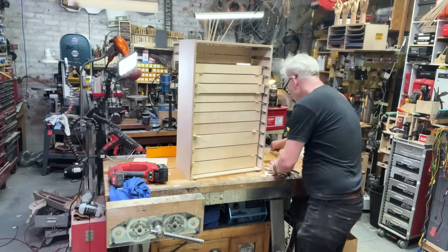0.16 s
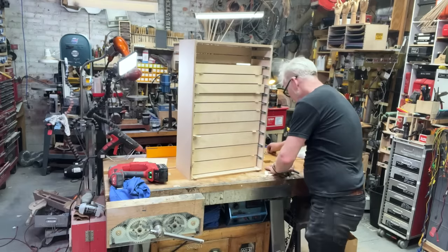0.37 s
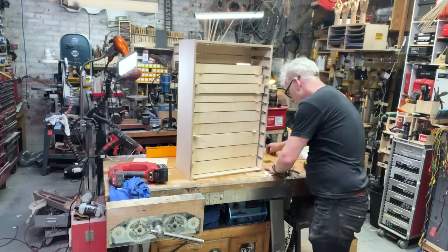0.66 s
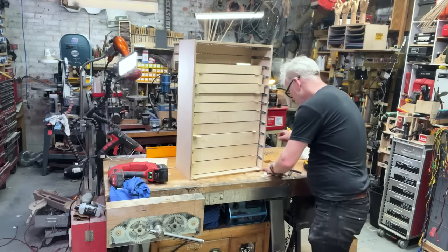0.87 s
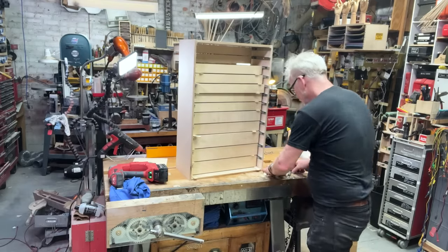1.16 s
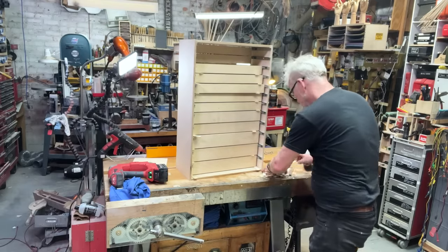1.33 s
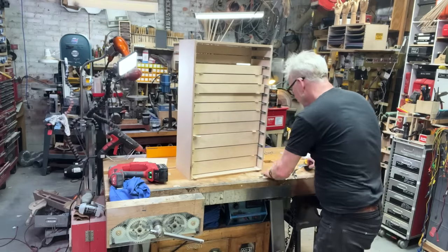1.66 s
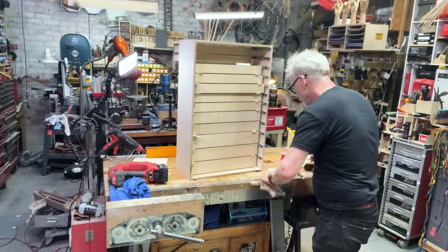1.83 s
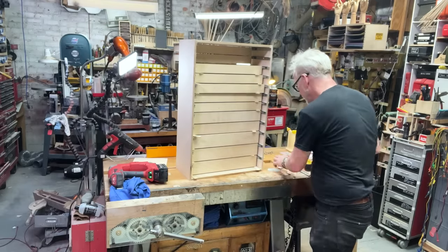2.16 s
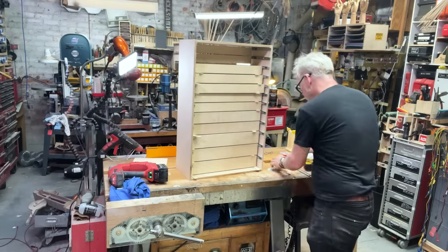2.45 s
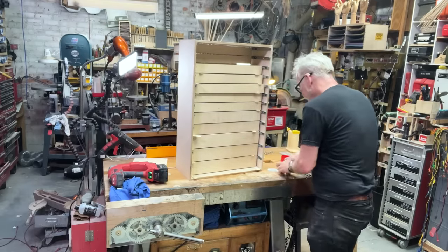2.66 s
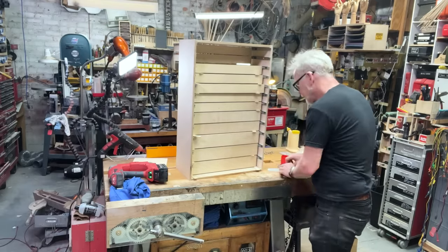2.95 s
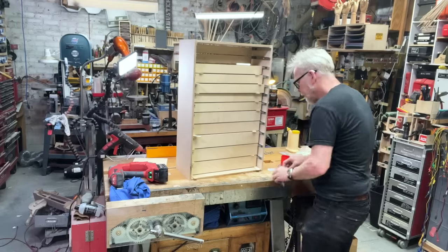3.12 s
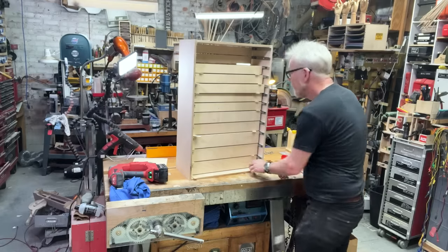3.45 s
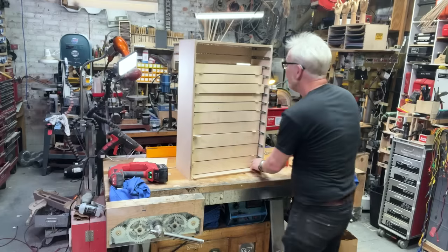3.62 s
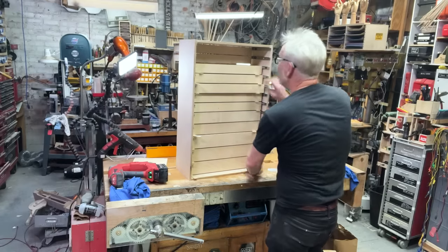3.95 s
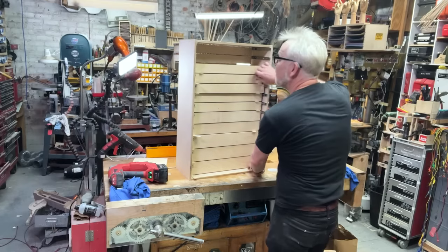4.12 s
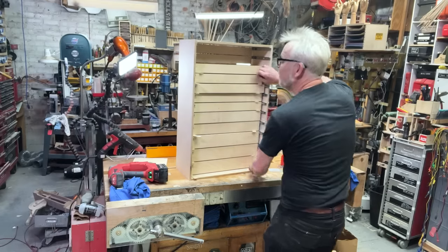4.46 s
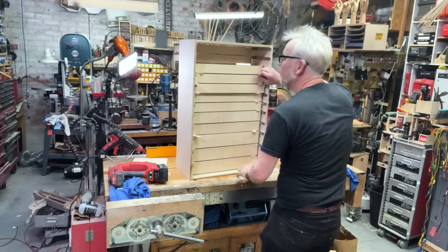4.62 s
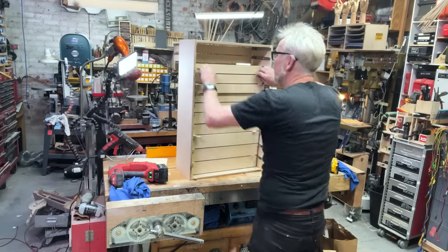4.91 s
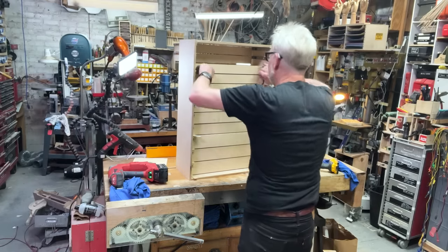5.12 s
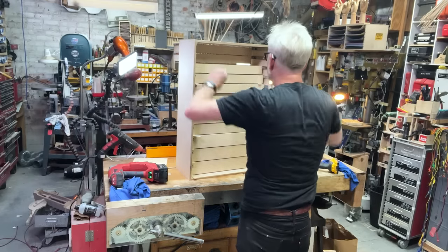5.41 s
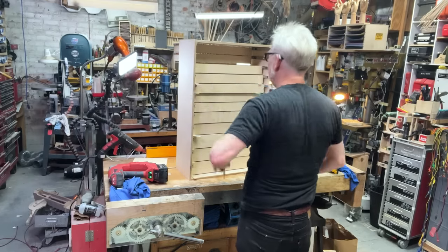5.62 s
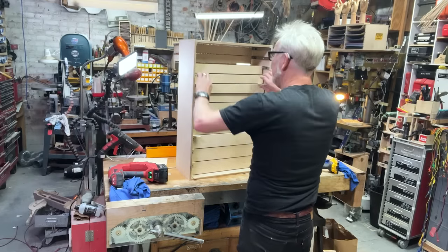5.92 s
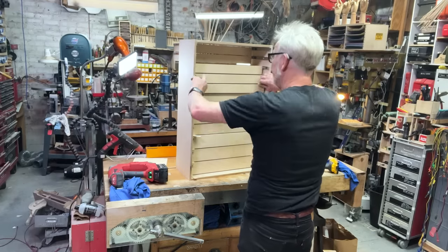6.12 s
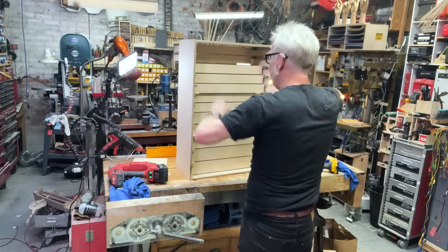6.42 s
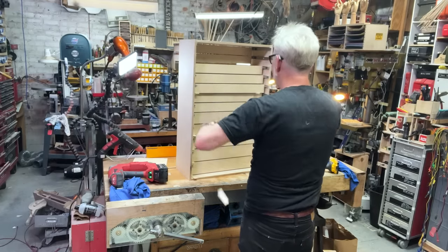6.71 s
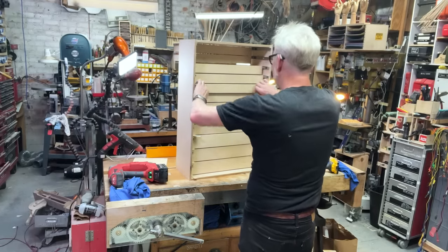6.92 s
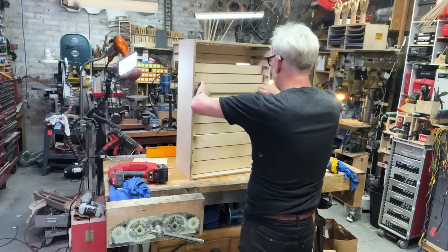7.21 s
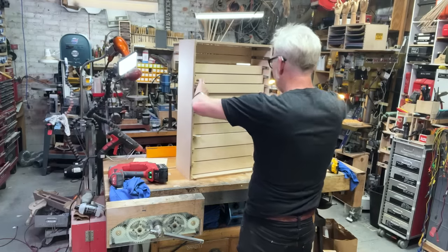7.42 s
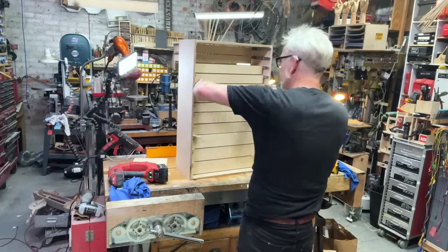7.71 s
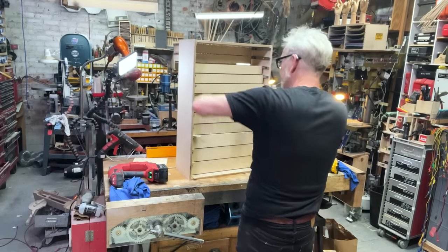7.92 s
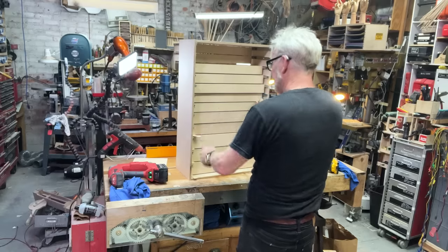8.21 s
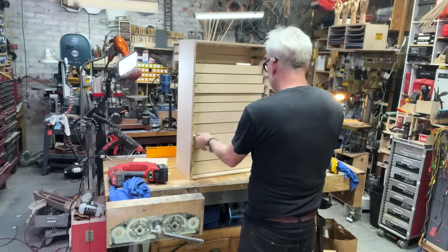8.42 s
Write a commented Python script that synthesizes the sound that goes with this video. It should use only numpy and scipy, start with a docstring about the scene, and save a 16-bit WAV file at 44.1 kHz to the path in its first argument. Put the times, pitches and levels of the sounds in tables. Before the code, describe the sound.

Thin wooden sticks clatter and bounce on a hard floor while wooden drawers knock, scrape and drop in an echoing workshop.

```python
"""Thin wooden sticks clatter onto a hard floor, each one ringing briefly as it bounces.
They are spacers, pulled from between the drawers of a small cabinet on a workbench.
A handful falls first; then each freed drawer knocks down and its stick drops and hops.
Wood rasps as it slides on wood, and the heavy bench thuds when it is bumped.
A cluttered workshop with a low hum echoes every blow."""
import sys
import numpy as np
from scipy import signal
from scipy.fft import rfft, irfft, next_fast_len
from scipy.io import wavfile
from scipy.ndimage import uniform_filter1d, minimum_filter1d

SR = 44100
rng = np.random.default_rng(int(sys.argv[2]) if len(sys.argv) > 2 else 0)


def output_pcm(signal):
    """Save a mono or channel-first signal as 16-bit PCM at the path in sys.argv[1].

    Samples are clipped to [-1, 1] before scaling.
    """
    pcm = np.clip(np.atleast_2d(signal).T, -1, 1) * 32767
    wavfile.write(sys.argv[1], SR, np.round(pcm).astype(np.int16))


N = 377937
NOW = np.arange(N) / SR  # clocks in seconds: the whole scene, one hit, one echo
BRIEF = np.arange(4096) / SR
TAIL = np.arange(24576) / SR

# A stick lands; flatness is how flat it falls: start_s, level_db, pitch_hz, flatness_db, tick_db
STICK_BOUNCES = [ (0.8793, -6.5, 6770, -21.5, -19), (1.568, -10.5, 6930, 8, 10.5), (2.251, 5, 6600, -2, 5),
                 (2.298, 11, 7960, 3.5, -13), (2.325, 13, 7500, 5.5, -7), (2.336, 6, 6880, 13.5, -11),
                 (2.355, 6, 5935, 6, -6.5), (2.375, 4.5, 7010, -7, 10.5), (2.394, 5.5, 6950, 7.5, -2),
                 (2.408, 11, 6070, -15.5, -22), (2.454, 9.5, 7030, 3, -10.5), (2.522, 7.5, 7800, 0, -8),
                 (2.546, 5.5, 7580, 8.5, -6), (2.5978, 16.5, 7160, 5, -8.5), (2.635, 8, 7940, 6.5, -16.5),
                 (2.689, 9.5, 6950, 0, -2.5), (2.695, 8, 7140, -3, -16.5), (2.809, -0.5, 7150, 0, -8),
                 (2.838, -2.5, 7020, 1.5, -8.5), (2.907, -7, 7220, -1, -9.5), (2.9726, 10, 8560, 0, -14),
                 (3.0585, 7.5, 8640, -6.5, -12), (3.066, -1, 8766, -2.5, -10.5),
                 (3.1303, 0, 8360, -7.5, -4.5), (3.695, 9, 7100, -17.5, -1), (3.721, 5, 7540, -1, 3),
                 (3.763, 17.5, 6670, -8, -7.5), (3.7823, 11.5, 6910, -11, -21), (3.82, 13, 6840, 0, -28),
                 (3.867, 8, 6660, 7, -22), (3.981, 0.5, 6730, 2.5, 1), (4.061, -3.5, 6640, 10, 1),
                 (4.184, 12, 6710, -6.5, -6), (4.312, -9, 8060, 0.5, -13), (5.479, 7, 6760, -16.5, -5),
                 (5.572, 1.5, 7020, -3, -5), (6.575, -1.5, 7300, 2, -0.5), (6.587, 5, 7120, -2, -6),
                 (6.8097, 13.5, 7120, -8.5, -15), (7.298, -3, 6650, 21.5, -28),
                 (7.3106, 16.5, 6870, -11, -12.5), (7.3553, 9, 7710, 1, 0), (7.443, 5.5, 7450, 1, -7),
                 (7.449, 5.5, 6000, -6.5, -18), (7.498, 1, 6190, 4.5, -18.5), (7.5319, -4, 6030, 5.5, 3.5),
                 (7.5921, 3, 6757, -1.5, -7.5), (8.400, -6.5, 6750, 16.5, -23), (8.482, 1.5, 6640, 17, -7),
                 (8.519, 8, 6810, 4, -19)]
# A heap of sticks tumbles: start_s, length_s, level_db, first_pitch_hz
HEAP_FALLS = [(2.256, .66, 0, 7335), (3.689, .22, 0, 6910), (7.301, .3, -11, 6810)]
# The tones (modes) of a bending stick; a decay is the time to fade by 60 dB:
# pitch_ratio, level_db, decay_s
STICK_TONES = [(0.873, -8, 0.016), (0.932, -10, 0.0145), (0.973, 3.5, 0.012), (1.016, 1.5, .018),
               (1.28, -31.5, 0.0061)]
# The broad clack of a stick on the floor: frequency_hz, level_db
CLACK_SPECTRUM = [(80, -8.5), (300, -3), (1200, -4), (2400, -2.5), (5000, -0.5), (8000, -4.5),
                  (12000, -24.5)]
# The high tick of the same contact: frequency_hz, level_db
TICK_SPECTRUM = [(3000, -25), (7000, 5), (9000, 2.5), (11000, -5.5), (12500, -13.5), (15000, -22)]
# A freed drawer lands on one edge, then falls flat:
# start_s, level_db, wait_until_flat_s, hollow_db, bass_db, edge_treble_db, flat_treble_db
DRAWER_DROPS = [(5.1489, 13.5, 0.007, -8, -21.5, -0.5, -7.5), (5.3389, 6, .009, -8, -17, -6.5, -2.5),
                (6.098, 14, .017, 3, -11, -14, -7), (6.4334, 14.5, .007, -5.5, -19, -18.5, -21),
                (7.06, 13, .015, 1, -6, -24, 13.5), (8.17, 11.5, .005, 2.5, -5, 2.5, 14),
                (8.4846, 15.5, .007, -0.5, -11, -43, 3)]
# Light taps of wood on wood: start_s, level_db, hollow_db, bass_db, treble_db
WOOD_TAPS = [(0.294, -34, 21, 26.5, 7.5), (1.591, -23.5, 14, -13, -11), (2.279, 10, -17, -1.5, -7),
             (2.358, 9.5, -10.5, -5, 0.5), (2.396, 8, -9, -7.5, -0.5), (2.839, -1.5, 11, -15, -8.5),
             (3.571, -13.5, 14.5, -19, -4), (3.682, 1.5, -15.5, -25.5, 4), (4.0442, -3, 8.5, -18, -19.5),
             (4.065, -5.5, 5, -27, -10), (4.626, -11, 8, -25.5, -13), (5.255, -14, 20, 15.5, 3),
             (5.48, -9.5, 7, 2, -1.5), (6.2562, -10.5, 22.5, 1, -9.5), (6.394, -10.5, 22.5, 0, -9),
             (6.577, -3, 5, -1, -5.5), (6.701, -21, 25.5, -18.5, -11.5), (6.935, -28, 20, -14, -14),
             (7.221, -3.5, 11, 0, -15.5), (7.31, -5.5, 10.5, 8, -14), (7.43, 0.5, 5, 5, -5),
             (7.592, -12, 8.5, -12, -4), (7.66, -14, 0.5, -16, -13), (8.348, -13, 19, -18, 1),
             (8.3863, -10, 13, -3, -13), (8.399, 0, 7.5, -15, -13)]
# The tones of the drawer panels: pitch_hz, level_db, decay_s
PANEL_TONES = [(157, -1.5, 0.29), (239, -1.5, 0.12), (358, 7, 0.033), (472, 0, 0.04), (473, 7.5, 0.026),
               (655, -9.5, 0.081), (1000, -11, 0.016), (1397, -7, 0.14), (1620, -8, 0.12),
               (2250, -2.5, 0.06), (2487, -4.5, 0.096), (6000, 7.5, 0.07)]
# The crack of wood striking wood: frequency_hz, level_db
KNOCK_SPECTRUM = [(60, -19.5), (150, 3), (400, -5.5), (900, -7), (2300, 2), (4000, -1), (6500, -1),
                  (8500, -6), (11000, -13), (14000, -32.5)]
# The bench is bumped and rocks back: start_s, level_db, favoured_pitch_hz, rocking_db
BENCH_BUMPS = [(0.288, 5, 192, 3), (1.599, -9.5, 196, 0.5), (1.65, -7.5, 86.3, -24), (2.302, -4, 165, -14),
               (2.471, -3.5, 162.5, -14.5), (3.578, 9, 178.6, 2), (4.773, -4, 180.2, -7.5),
               (4.795, 2.5, 64.5, -20), (4.921, -4, 60, -14.5), (5.245, -7, 180, -5),
               (6.109, -5, 131.6, -17), (7.082, -4.5, 112, -17), (7.359, -0.5, 69, -26.5),
               (7.492, 2, 93, -21), (7.611, -7, 68, -22), (8.177, 4.5, 182, -24)]
# The tones of the heavy bench: pitch_hz, level_db, decay_s
BENCH_TONES = [(60, -1, 0.26), (76.2, 3, 0.19), (91.2, 1.5, 0.026), (126, 3, 0.12), (168, 0.5, 0.15),
               (221, 3, 0.11), (260, -0.5, 0.073)]
# Wood slides on wood: start_s, length_s, level_db, swell_db, brightness_db, rasp_pitch_hz, rasp_db
SLIDE_STROKES = [(0.291, .12, -62.5, -5, 8, 700, -2), (0.725, 0.2, -51, -2, -29.5, 5650, 0),
                 (0.881, 0.1, -52, -3, 3, 6600, -4), (1.222, .15, -52.5, -6.5, 5, 2162, -10.5),
                 (1.383, 0.12, -49.5, -4, -3, 3280, -4.5), (1.505, 0.04, -32, -8, -11, 3600, -9),
                 (1.564, 0.067, -33, -17, 8, 2000, -11), (1.653, .235, -38, 10, 2.5, 3597, -11),
                 (1.994, .025, -66.5, -5.5, -5, 3310, 10), (2.059, 0.082, -63.5, -2.5, 7, 6000, -6),
                 (3.562, 0.062, -47, -1, -5, 1766, 2), (4.326, 0.15, -50.5, -10, -6, 3020, -18),
                 (4.601, .06, -50.5, -6, -8, 3020, -14), (4.738, .03, -55.5, -5, 6, 6484, -10.5),
                 (4.82, .055, -64, 5, 6, 6540, 7), (5.019, 0.032, -43.5, -2, -11.5, 3886, -4),
                 (6.259, .12, -41, 8, -1.5, 2360, -11), (7.71, 0.069, -58.5, -2.5, 0, 3290, 6),
                 (7.812, 0.08, -46, 15, 1, 1910, -13)]
# The hiss of rubbing wood: frequency_hz, level_db
RUB_SPECTRUM = [(290, -51.5), (500, -34), (871, -29), (976, -21.5), (1330, -33), (2460, -12.5),
                (2880, -16.5), (3270, -12), (7260, -2), (9790, -14), (15000, -36.5)]
# How long the workshop echoes: frequency_hz, decay_s
ECHO_DECAYS = [(100, 0.45), (500, 0.65), (2000, 0.49), (7000, 0.41), (13000, 0.23)]
# The rumble of the ventilation: frequency_hz, level_db
AIR_SPECTRUM = [(25, -42.5), (45, -19), (65, -5.5), (130, -1), (180, -6), (290, -13), (350, -9), (450, -18),
                (900, -31), (1800, -33), (2600, -23.5), (3300, -36), (8000, -32.5), (15000, -59.5)]
# The hum of the mains power: pitch_hz, level_db
HUM_TONES = [(121, -62), (241, -68), (360.3, -68)]

LOW_RING_RATIO, LOW_RING_DECAY_S = .437, .045  # a stick's deeper tone
LOW_RING_DB, CLACK_DB = -14, -8.5  # next to the main ring; a flatter landing raises both
CLACK_TICK_SHARE = 0.22  # how far the clack follows the tick
TUMBLE_FADE_DB, TUMBLE_PITCH_SAG = -11.5, 0.067  # a heap fades; longer, lower sticks settle last
FLAT_DB, FLAT_HOLLOW_DB, FLAT_BASS_DB = -8.5, 12.5, 14  # a drawer's flat blow next to its edge blow
ROCK_GAP_S, ROCK_PITCH_RATIO, ROCK_FADE_DB = .033, .63, -8.5  # the second rock is weaker
STROKE_ATTACK_S, STROKE_RELEASE_S = 0.012, .016
SUPPRESS_DB, TOP_HZ = 11.5, 15800  # the deepest cut of the noise suppressor; the final treble cutoff


def stick_hit(hz, flat_db, tick_db, far_end_db=-12):
    """One bounce: the stick bends and rings over the clack and tick of the contact."""
    tones = [(hz * ratio, db, decay_s) for ratio, db, decay_s in STICK_TONES]
    main = ring(BRIEF, tones, rise_s=0.0014, detune=0.0018)
    low = ring(BRIEF, [(hz * LOW_RING_RATIO, 0, LOW_RING_DECAY_S)], rise_s=.001)
    clack_db = CLACK_DB + flat_db + CLACK_TICK_SHARE * tick_db
    clack = undb(clack_db) * crack(CLACK_SPECTRUM, decay_s=0.032)
    tick = undb(tick_db) * crack(TICK_SPECTRUM, decay_s=0.016)
    hit = main + undb(LOW_RING_DB + flat_db) * low + clack + tick
    # the other end touches down a few milliseconds later
    add(hit, rng.uniform(0.0026, 0.0068), undb(far_end_db) * hit)
    return hit


def bouncing_sticks(echoes):
    """Single sticks land and hop on the floor."""
    out = np.zeros(N)
    for start_s, db, hz, flat_db, tick_db in STICK_BOUNCES:
        add(out, start_s, undb(db) * in_room(stick_hit(hz, flat_db, tick_db), echoes, echo_db=-3.0))
    return out


def tumbling_sticks(echoes, hits_per_s=110, pitch_spread=.04, scatter_db=3.0):
    """A heap of sticks of slightly unequal length makes many small, uneven bounces that die away."""
    out = np.zeros(N)
    for start_s, length_s, db, hz in HEAP_FALLS:
        for age_s in np.arange(0, length_s, 1 / hits_per_s):
            late, shift, force = rng.standard_normal(3)
            progress = age_s / length_s
            pitch_hz = hz * (1 - TUMBLE_PITCH_SAG * progress + pitch_spread * shift)
            gain = undb(db + TUMBLE_FADE_DB * progress + scatter_db * force)
            add(out, start_s + age_s + .002 * late, gain * stick_hit(pitch_hz, flat_db=6.5, tick_db=-6))
    return in_room(out, echoes, echo_db=0.0)[:N]


def wood_knock(echoes, hollow_db, bass_db, treble_db, echo_db, panels_db=-8):
    """Wood strikes wood: a crack and a brief ring of the panels, shaded by how the pieces meet."""
    panels = ring(BRIEF, PANEL_TONES, rise_s=0.0006, detune=.025)
    blow = undb(panels_db) * in_room(panels, echoes, echo_db)
    add(blow, 0, crack(KNOCK_SPECTRUM, decay_s=0.031))
    # the room gathers the crack from all directions, so its echo has a smooth spectrum
    crack_echo = unit(colour(echoes[rng.integers(len(echoes))], KNOCK_SPECTRUM))
    add(blow, 0, undb(echo_db) * crack_echo)
    return colour(blow, [(250, bass_db), (800, hollow_db), (2000, 0), (3500, 0.0051), (8000, treble_db)])


def drawer_knocks(echoes):
    """Drawers drop with a double knock; loose sticks and drawer fronts tap once."""
    out = np.zeros(N)
    for start_s, db, wait_s, hollow_db, bass_db, edge_treble_db, flat_treble_db in DRAWER_DROPS:
        edge = wood_knock(echoes, hollow_db, bass_db, edge_treble_db, echo_db=-1.0)
        flat = wood_knock(echoes, hollow_db + FLAT_HOLLOW_DB, bass_db + FLAT_BASS_DB,
                          flat_treble_db, echo_db=2.6)
        add(out, start_s, undb(db) * edge)
        add(out, start_s + wait_s, undb(db + FLAT_DB) * flat)
    for start_s, db, hollow_db, bass_db, treble_db in WOOD_TAPS:
        add(out, start_s, undb(db) * wood_knock(echoes, hollow_db, bass_db, treble_db, echo_db=3.5))
    return out


def bench_thuds(echoes, db_per_octave=14):
    """A soft, heavy bump wakes only low tones; the bench then rocks twice, deeper each time."""
    out = np.zeros(N)
    for start_s, db, pitch_hz, rock_db in BENCH_BUMPS:
        for rock, push_db in enumerate([0, rock_db, rock_db + ROCK_FADE_DB]):
            push_hz = pitch_hz * ROCK_PITCH_RATIO ** rock
            # tones far from the pitch of the push ring less
            tones = [(hz, tone_db - db_per_octave * abs(np.log2(hz / push_hz)), decay_s)
                     for hz, tone_db, decay_s in BENCH_TONES]
            thud = ring(TAIL[:len(TAIL) // 2], tones, rise_s=0.011, detune=0.038)
            add(out, start_s + rock * ROCK_GAP_S, undb(db + push_db) * in_room(thud, echoes, echo_db=-8))
    return out


def sliding_wood(echoes, grain_db=4):
    """Wood fibres catch and slip in dense, tiny clicks; each stroke has its own brightness and rasp."""
    out = np.zeros(N)
    size = len(TAIL) // 3 * 2
    treble_filter = signal.butter(3, 8200, "high", fs=SR, output="sos")
    for start_s, length_s, db, swell_db, bright_db, rasp_hz, rasp_db in SLIDE_STROKES:
        noise = rng.standard_normal(size)
        roughness = undb(grain_db * np.repeat(rng.standard_normal(size // 64), 64))
        rub = unit(colour(noise * roughness, RUB_SPECTRUM)) * np.sqrt(size)
        treble = signal.sosfiltfilt(treble_filter, rub)
        friction = rub - treble + undb(bright_db) * treble + undb(rasp_db) * rasp(rasp_hz, size)
        add(out, start_s, undb(db) * hand_push(length_s, swell_db)[:size] * friction)
    return in_room(out, echoes, echo_db=-3.5)[:N]


def rasp(hz, size, width=0.26):
    """Uneven slips keep one tone of the wood ringing."""
    slips = rng.standard_normal(size) ** 3  # cubing makes the noise spiky
    resonance = np.exp(-np.pi * width * hz * BRIEF) * BRIEF * np.sin(2 * np.pi * hz * BRIEF)
    return np.sqrt(size) * unit(signal.fftconvolve(slips, resonance)[:size])


def hand_push(length_s, swell_db):
    """The loudness of one stroke: a quick start, a steady swell or fade, a quick release."""
    attack = np.minimum(TAIL / STROKE_ATTACK_S, 1)
    swell = undb(swell_db * (np.minimum(TAIL / length_s, 1) - .5))
    release = np.exp(-np.maximum(TAIL - length_s, 0) / STROKE_RELEASE_S)
    return attack * swell * release


def workshop_echoes(spots, early_db=6, early_s=0.036):
    """Echoes at several spots: distinct at first, then blurred; shelves swallow the treble first."""
    hz = np.fft.rfftfreq(len(TAIL), 1 / SR)
    surfaces = np.repeat(rng.standard_normal((spots, len(TAIL) // 32)), 32, axis=1)
    reflections = undb(early_db * np.exp(-TAIL / early_s) * np.clip(surfaces, -2, 2))
    spectrum = rfft(rng.standard_normal((spots, len(TAIL))) * reflections)
    centres_hz = [centre for centre, _ in ECHO_DECAYS]
    echoes = 0
    for share, (_, decay_s) in zip(np.eye(len(centres_hz)), ECHO_DECAYS):
        band = irfft(spectrum * at_hz(hz, list(zip(centres_hz, share))))
        echoes = echoes + band * fade(TAIL, decay_s)
    soak = np.exp(-(TAIL / .235) ** 4)  # packed shelves soak up the last of the echo
    build_up = 1 - np.exp(-TAIL / 0.0044)
    return [unit(echo * soak * build_up) for echo in echoes]


def in_room(x, echoes, echo_db):
    """The direct sound, followed by the echo of one random spot."""
    heard = undb(echo_db) * signal.fftconvolve(x, echoes[rng.integers(len(echoes))])
    heard[:len(x)] += x
    return heard


def workshop_air():
    """The ventilation rumbles and the mains power hums."""
    size = next_fast_len(N)
    shape = undb(at_hz(np.fft.rfftfreq(size, 1 / SR), AIR_SPECTRUM))
    rumble = irfft(rfft(rng.standard_normal(size)) * shape, size)[:N]
    hum = sum(undb(db) * np.sqrt(2) * np.sin(2 * np.pi * (hz * NOW + rng.random()))
              for hz, db in HUM_TONES)
    return undb(-59.5) * unit(rumble) * np.sqrt(N) + hum


def ring(t, tones, rise_s, detune=0.):
    """Fading tones build up during a contact; where the blow lands varies their strength."""
    total = 0
    for hz, db, decay_s in tones:
        strength, shift, phase = rng.standard_normal(3)
        wave = np.sin(2 * np.pi * (hz * (1 + detune * shift) * t + phase))
        total = total + undb(db + 2 * strength) * fade(t, decay_s) * wave
    return unit(total * (1 - np.exp(-t / rise_s)) ** 2)


def crack(spectrum, decay_s):
    """Countless short-lived tones blur into one burst of noise."""
    return unit(colour(rng.standard_normal(len(BRIEF)) * fade(BRIEF, decay_s), spectrum))


def colour(x, spectrum, size=2048):
    """Filter x to follow a spectrum, with no ringing ahead of a hit (minimum phase)."""
    gains = undb(at_hz(np.fft.rfftfreq(size, 1 / SR), spectrum))
    cepstrum = irfft(np.log(gains))
    # fold the part before time zero onto the part after it
    cepstrum[1:size // 2] *= 2
    cepstrum[size // 2 + 1:] = 0
    response = irfft(np.exp(rfft(cepstrum)))
    return signal.fftconvolve(x, response)[:len(x)]


def undb(db):
    """Turn decibels into a gain."""
    return 10 ** (np.asarray(db) / 20)


def unit(x):
    """Scale to an energy of one."""
    return x / np.sqrt(np.sum(x ** 2) + 1e-20)


def at_hz(hz, points):
    """Read between (frequency_hz, value) points on a log-frequency axis."""
    points_hz, values = np.transpose(points)
    return np.interp(np.log(hz + 1), np.log(points_hz), values)


def fade(t, decay_s):
    """Die away by 60 dB every decay_s."""
    return np.exp(-np.log(1000) * t / np.maximum(decay_s, 1e-3))


def add(out, start_s, x):
    """Mix x into out, beginning at start_s."""
    first = max(int(start_s * SR), 0)
    out[first:first + len(x)] += x[:max(len(out) - first, 0)]


def suppress_noise(x, margin_db=23):
    """Turn down pitch bands as they sink towards their steady background, so echoes end early."""
    hz, _, bands = signal.stft(x, SR, nperseg=512)
    power = uniform_filter1d(abs(bands) ** 2, size=7, axis=-2)  # smooth over pitch
    power = uniform_filter1d(power, size=3, axis=-1)  # then over time
    background = np.quantile(power, .1, axis=-1, keepdims=True)
    # low sounds get through more easily than high ones
    margin = undb(margin_db + at_hz(hz, [(250, -14.0), (2000, -14), (7000, -7)]))[:, None]
    opening = power / (power + margin ** 2 * background + 1e-20)
    return signal.istft(bands * undb(-SUPPRESS_DB * (1 - opening)), nperseg=512)[1][..., :N]


def limit_peaks(x, ceiling=.93):
    """The level dips for about a millisecond around any peak above the ceiling."""
    gain = np.minimum(1, ceiling / (abs(x) + 1e-9))
    held = minimum_filter1d(gain, size=45, axis=-1)
    return x * uniform_filter1d(held, size=45, axis=-1)


def scene():
    """Everything reaches one microphone across the bench."""
    echoes = workshop_echoes(spots=8)
    air = undb(SUPPRESS_DB) * workshop_air()  # raised here because the suppressor turns it down
    cabinet = sliding_wood(echoes) + bench_thuds(echoes) + drawer_knocks(echoes)
    sticks = bouncing_sticks(echoes) + tumbling_sticks(echoes)
    return (sticks + cabinet + air)[None]


def record(dry, bass_hz=48, treble_hz=13200):
    """Noise is turned down, the microphone loses deep bass and top treble, and peaks are limited."""
    heard = suppress_noise(dry)
    heard = signal.sosfilt(signal.butter(5, bass_hz, "high", fs=SR, output="sos"), heard)
    heard = signal.sosfilt(signal.butter(10, treble_hz, fs=SR, output="sos"), heard)
    return signal.sosfilt(signal.ellip(8, .2, 80, TOP_HZ, fs=SR, output="sos"), limit_peaks(heard))


dry = scene()
out = record(dry)
output_pcm(out)
```